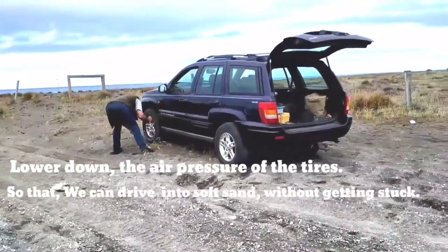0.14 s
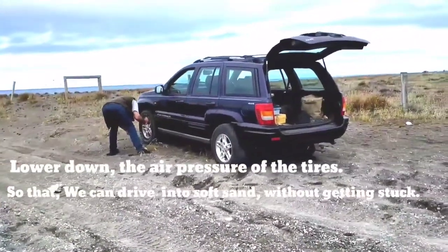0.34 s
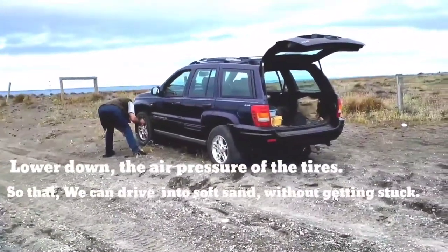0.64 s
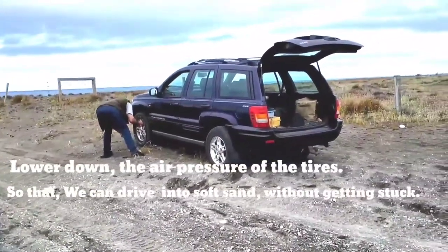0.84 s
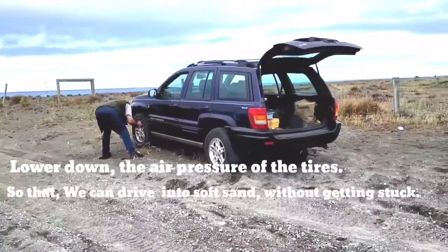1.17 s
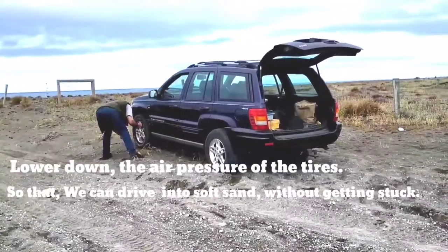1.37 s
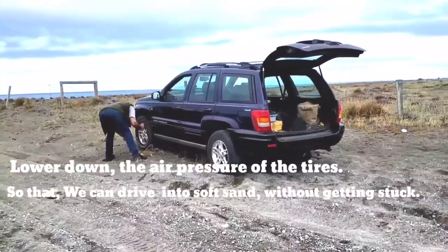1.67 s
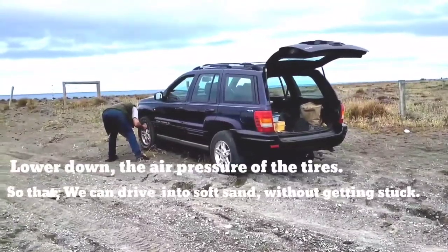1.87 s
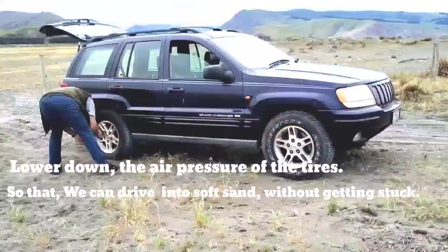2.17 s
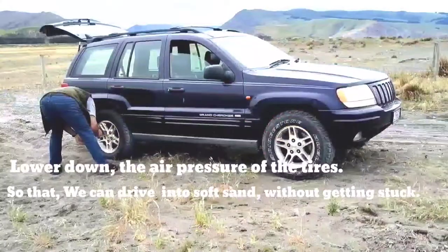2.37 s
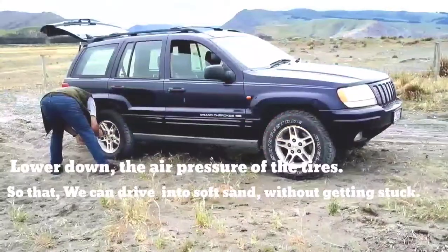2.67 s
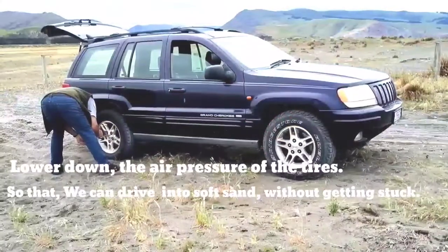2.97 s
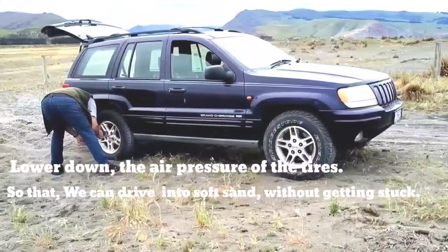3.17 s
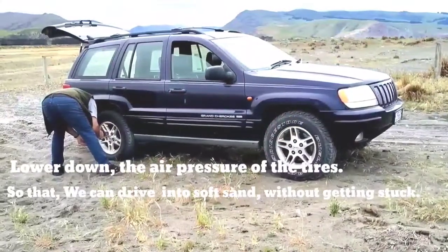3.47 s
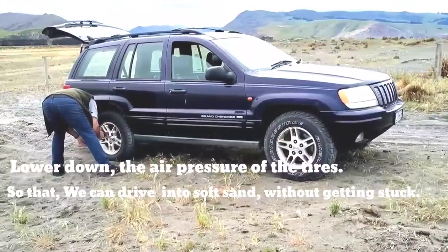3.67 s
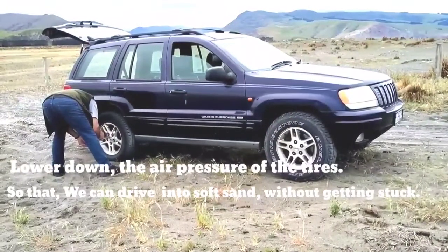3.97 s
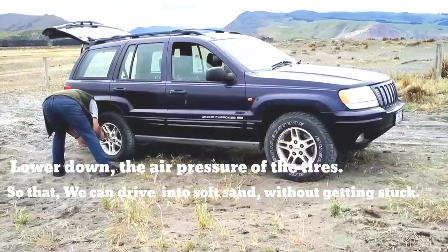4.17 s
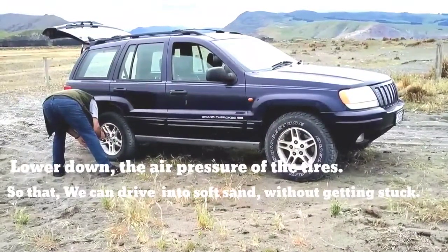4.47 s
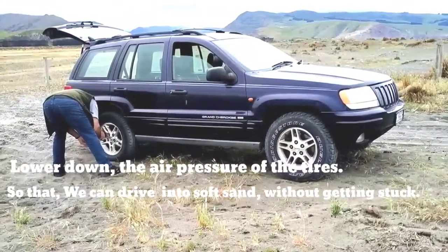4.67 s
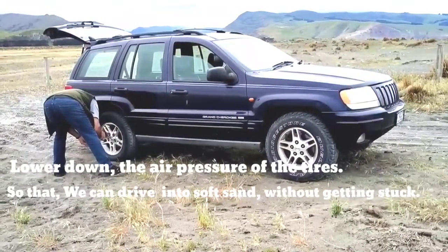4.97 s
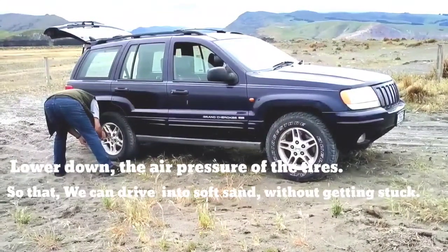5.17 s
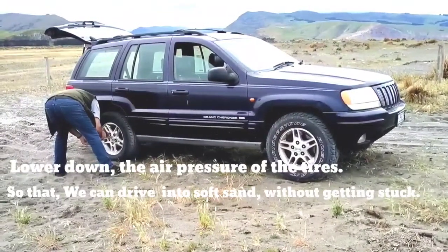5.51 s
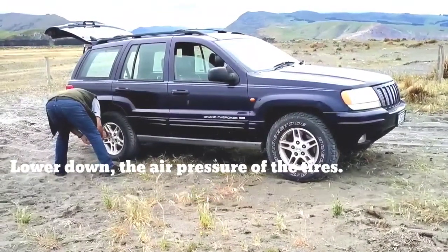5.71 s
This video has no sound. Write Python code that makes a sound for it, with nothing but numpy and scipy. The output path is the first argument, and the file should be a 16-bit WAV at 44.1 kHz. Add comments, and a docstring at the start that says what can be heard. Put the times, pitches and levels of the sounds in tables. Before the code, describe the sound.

Outdoors in gusty wind, shoes scuff grit and a tyre valve releases a bright hiss that cuts out briefly, then continues steadily.

```python
"""On a windy sandy track, air is let out of a car tyre. We listen from behind the car and then,
after a short silence, from beside it. Shoes scuff the grit, the valve squeaks as its pin is pressed,
and a thin bright jet of air hisses out, coloured by the wheel.
Wind buffets the microphone and a lark sings far away."""
import sys
import numpy as np
from scipy import signal
from scipy.fft import rfft, irfft
from scipy.io import wavfile
from scipy.ndimage import uniform_filter1d

SR = 44100
rng = np.random.default_rng(int(sys.argv[2]) if len(sys.argv) > 2 else 0)


def put_to_file(sound):
    """Save the sound as 16-bit audio at rate SR, in the file named by the first command-line argument."""
    columns = np.atleast_2d(sound).T  # one column per channel
    safe = np.clip(columns, -1, 1)
    whole_steps = np.round(safe * 32767)
    wavfile.write(sys.argv[1], SR, whole_steps.astype(np.int16))


N = 257753
T = np.arange(N) / SR
HZ = np.maximum(np.arange(N // 2 + 1) * SR / N, 1)

# broad hiss of the jet in each place: (frequency [Hz], relative level [dB])
HISS_BEHIND = [(300, -41), (1000, -31.5), (2300, -25.5), (3600, -25.5), (5200, -29.5), (7000, -25),
               (10000, -27), (13000, -14), (15500, -19)]
HISS_BESIDE = [(300, -34), (900, -34), (1500, -29), (2300, -25), (3150, -32.5), (3900, -28.5), (5000, -27),
               (7000, -28.5), (11500, -23), (13200, -16), (15500, -10)]
# bands that valve, rim and wheel arch boost: (frequency [Hz], width [Hz], relative level [dB])
WHEEL_BANDS_BEHIND = [(7780, 330, -10.5), (8220, 430, -11), (9400, 170, -16.5), (10050, 250, -16),
                      (10900, 200, -26), (11400, 200, -12), (12300, 430, -13), (12750, 450, -20),
                      (13550, 250, -13.5), (13600, 310, -7), (14550, 410, -5), (14900, 310, -2),
                      (15300, 130, 1)]
WHEEL_BANDS_BESIDE = [(4340, 200, -26), (5680, 300, -18), (6200, 370, -16), (6830, 230, -17),
                      (7390, 210, -12.5), (7680, 100, -11.5), (7980, 140, -15), (8280, 240, -10),
                      (8780, 340, -9), (9180, 230, -14), (10015, 237, -5), (10430, 220, -5.5),
                      (10640, 180, -12), (10900, 130, -27), (11140, 89, -10), (11940, 150, -7.5),
                      (12000, 210, -19), (12450, 190, -6.5), (12720, 240, -9), (13200, 100, -7),
                      (14130, 330, 2.5), (14700, 380, 2), (15030, 520, 3.5), (16500, 120, -6)]
# air spitting as the pin first lifts: (time [s], length [s], level [dB])
AIR_SPITS = [(1.232, 0.034, -68.5), (1.41, 0.078, -82), (1.563, 0.031, -75)]
# squeaks of the barely open valve: (time [s], length [s], start pitch [Hz], middle pitch [Hz],
# end pitch [Hz], level [dB], relative level of the octave above [dB])
VALVE_SQUEAKS = [(1.268, 0.015, 7800, 7580, 7600, -55, -22), (1.279, 0.024, 7400, 7270, 7300, -62.5, -4),
                 (1.293, 0.029, 7280, 7500, 7520, -62.5, -18), (1.352, 0.053, 7660, 7700, 7350, -76.5, 10),
                 (1.403, 0.017, 7300, 7030, 6800, -72, 12.5)]
# the hand covers or uncovers the hiss: (middle time [s], length [s], change [dB])
HAND_MOVES = [(4.42, .3, -1.3), (5.302, 0.48, 1.74)]
# shoes on the grit: (time [s], length [s], rasp level [dB], crunch level [dB])
SHOE_SCUFFS = [(1.015, 0.038, -66.5, -76), (1.225, 0.024, -63, -76), (1.473, 0.034, -65, -71),
               (1.555, 0.026, -63.5, -77), (1.577, 0.0896, -64.5, -51), (2.046, 0.068, -69, -77),
               (5.28, .02, -62, -72)]
# gritty rasp and hollow crunch of a scuff: (frequency [Hz], relative level [dB])
RASP_COLOUR = [(300, -2.5), (1200, 5.5), (2400, 7.5), (3600, 2.5), (4900, -1.5), (6000, -17), (8000, -7),
               (10000, -27), (15000, -12.5)]
CRUNCH_COLOUR = [(150, 0.5), (400, 7.5), (700, -4), (820, -3), (900, 7.5), (1020, -6.5), (1350, -4),
                 (2000, -38), (4000, -32)]
# wind rumble in each place: (frequency [Hz], relative level [dB])
WIND_BEHIND = [(15, -15), (35, -1.5), (60, 1.5), (95, -1), (135, -6), (200, -12.5), (300, -22.5),
               (450, -36), (700, -51), (1000, -61.5)]
WIND_BESIDE = [(15, 5), (35, -3), (60, -6), (95, -13.5), (140, -23.5), (210, -33.5), (290, -46.5),
               (420, -67)]
# gusts on top of the breeze: (middle time [s], length [s], level [dB])
WIND_GUSTS = [(0.752, 0.029, -29), (0.926, 0.02, -30.5), (1.483, 0.017, -29.5), (1.625, 0.088, -33),
              (1.894, 0.11, -29.5), (1.989, 0.044, -30.5), (2.151, 0.037, -29), (2.507, 0.19, -40.5),
              (3.195, 0.055, -38), (3.518, .05, -40.5), (3.67, 0.1, -33.5), (3.857, 0.072, -37.5),
              (4.23, 0.047, -38.5), (4.55, 0.11, -44), (4.955, 0.025, -37.5), (5.13, 0.12, -38),
              (5.463, 0.11, -39), (5.796, 0.07, -38.5)]
# small swirls of air that hit the microphone: (time [s], peak level [dB], width [s])
WIND_EDDIES = [(2.847, -34.5, 0.0059), (3.179, -25, 0.0046), (3.63, -31, 0.0043), (4.052, -32.5, 0.0044),
               (5.098, -30, 0.0048)]
# lark whistles: (time [s], length [s], start pitch [Hz], middle pitch [Hz], end pitch [Hz], level [dB])
LARK_NOTES = [(0.446, 0.092, 4650, 4150, 4000, -80.5), (.59, .068, 4450, 4060, 3850, -80),
              (0.697, 0.14, 4540, 4470, 4500, -86), (0.929, 0.21, 4210, 3900, 3940, -81),
              (1.264, 0.09, 3250, 3070, 2660, -76.5), (2.735, 0.033, 3780, 3540, 3300, -72),
              (2.805, .06, 3750, 3800, 3870, -76), (2.986, 0.038, 3920, 3400, 3250, -72),
              (3.08, .24, 3680, 3800, 3800, -69), (3.305, 0.034, 3800, 3570, 3240, -68),
              (3.42, 0.17, 3660, 3780, 3740, -70), (3.65, 0.057, 3600, 3450, 3230, -77)]
# hush of the open air: (frequency [Hz], relative level [dB])
AIR_COLOUR = [(100, 7), (600, -3.5), (1200, -1.5), (2500, -3), (4500, -9), (5600, -17), (6800, -15.5),
              (7800, -13), (9000, -18), (12000, -14), (15300, -7)]

LEAVE_S, RETURN_S, FADE_S = 2.253, 2.333, 0.098   # the first place cuts out, the second fades in
JET_BEHIND_DB, JET_BESIDE_DB = -53.5, -50   # body of the hiss at full flow
TOP_DB = 7   # how far the highest treble stands above that body
OPEN_S, OPENING_S, OPENING_RISE_DB = 1.602, 0.2, 22.5   # the pin goes down and the jet swells
EASE_S, EASING_S, EASED_DB = 2.155, 0.052, -11.5   # the thumb eases off the pin
PRESS_S, PRESSING_S, LIGHT_PRESS_DB = 2.71, 0.12, -1.1   # a light hold, then the pin is pressed home
SNAP_S, SNAP_DB, SNAP_DECAY_S = 1.4655, -52.5, 0.017   # a pebble snaps, then fades by 60 dB
BREEZE_BEHIND_DB, BREEZE_BESIDE_DB = -33, -46.5
LULL_S, LULL_DB_PER_S = 1.56, 15   # behind the car the breeze dies down


def jet(top_db, hiss_colour, wheel_bands, flutter_db, sway_db=0.44, sway_hz=4, top_hz=12500):
    """Rushing air rings in the wheel; its highest treble is a narrow beam that sways with the hand."""
    power = colour(hiss_colour) ** 2
    for hz, width, db in wheel_bands:
        power = power + (from_db(db) / (1 + ((HZ - hz) / (0.7 * width)) ** 2)) ** 2
    top_share = 1 / (1 + (top_hz / HZ) ** 60)
    beam = from_db(top_db + sway_db * drift(sway_hz))
    body = noise(np.sqrt(power * (1 - top_share)))
    top = noise(np.sqrt(power * top_share))
    return (body + beam * top) * from_db(flutter_db * drift(14))


def valve_opening(squeak_waver=0.0061):
    """Air spits and squeaks through the narrow gap, then flows fully until the thumb eases off."""
    opened = ramp(OPEN_S, OPENING_S)
    flow_db = JET_BEHIND_DB - OPENING_RISE_DB * (1 - opened) + EASED_DB * ramp(EASE_S, EASING_S)
    flow = from_db(flow_db) * (T > OPEN_S)
    spits = sum(from_db(db) * burst(start, length) for start, length, db in AIR_SPITS)
    top_db = TOP_DB * opened   # the jet brightens as it grows
    sound = (flow + spits) * jet(top_db, HISS_BEHIND, WHEEL_BANDS_BEHIND, flutter_db=1.1)
    waver = squeak_waver * drift(400)
    for *note, db, octave_db in VALVE_SQUEAKS:
        phase, swell = glide(*note, waver)
        sound += from_db(db) * swell * (np.sin(phase) + from_db(octave_db) * np.sin(2 * phase))
    return sound


def valve_held(turn_db_per_s=0.3):
    """With the pin held down, the hand shades the hiss while the treble beam slowly turns our way."""
    flow_db = JET_BESIDE_DB + LIGHT_PRESS_DB * (1 - ramp(PRESS_S, PRESSING_S))
    hand_db = sum(db * hump(middle, length) for middle, length, db in HAND_MOVES)
    top_db = TOP_DB + turn_db_per_s * (T - T[T > RETURN_S].mean())
    # taking hand_db off the top lets these moves change only the body of the hiss
    hiss = jet(top_db - hand_db, HISS_BESIDE, WHEEL_BANDS_BESIDE, flutter_db=0.5)
    return from_db(flow_db + hand_db) * hiss


def scuffs(slips_per_s=105, grain_db=-2.0):
    """Grit sticks and slips under a shoe: each slip starts sharply and fades before the next."""
    slip_count = np.cumsum(slips_per_s * np.exp(0.25 * drift(60))) / SR
    grains = rms_one(np.exp(-2 * (slip_count % 1)) * from_db(grain_db * drift(120)))
    rasp, crunch = noise(colour(RASP_COLOUR)), noise(colour(CRUNCH_COLOUR))
    slides = sum(burst(start, length) * (from_db(rasp_db) * rasp + from_db(crunch_db) * crunch)
                 for start, length, rasp_db, crunch_db in SHOE_SCUFFS)
    return grains * slides


def pebble_snap(brightening=0.46):
    """A hard pebble snaps under the sole, brighter than the sliding grit."""
    decay = (T > SNAP_S) * np.exp(-np.log(1000) * np.abs(T - SNAP_S) / SNAP_DECAY_S)
    return from_db(SNAP_DB) * decay * noise(colour(RASP_COLOUR) * HZ ** brightening)


def wind(level, rumble_colour, lumpy_db, split_hz):
    """Swirling air rumbles on the microphone; the finer swirls, above split_hz, come in lumps."""
    rumble = noise(colour(rumble_colour))
    fine = irfft(rfft(rumble) * HZ ** 2 / (HZ ** 2 + split_hz ** 2), N)
    rumble = rumble + fine * (from_db(lumpy_db * drift(49)) - 1)
    running_level = np.sqrt(uniform_filter1d(rumble ** 2, size=SR // 10))
    return level * rumble / running_level


def wind_strength(breeze_db, buffet_db, buffet_hz=10):
    """A wavering breeze plus gusts that each swell and die away."""
    breeze = from_db(breeze_db + buffet_db * np.tanh(drift(buffet_hz)))
    gust_power = sum(from_db(db) ** 2 * hump(middle, length) for middle, length, db in WIND_GUSTS)
    return np.sqrt(breeze ** 2 + gust_power)


def eddies():
    """Each swirl of air is one smooth push, with a pull just before and after."""
    pressure = np.zeros(N)
    for middle, db, width in WIND_EDDIES:
        distance = ((T - middle) / width) ** 2 / 2
        pressure += from_db(db) * (1 - distance) * np.exp(-distance)
    return pressure


def lark(pitch_waver=0.0052):
    """A far-off lark whistles, trills and twitters, fading in and out on the wind."""
    whistles, waver = np.zeros(N), pitch_waver * drift(60)
    for *note, db in LARK_NOTES:
        phase, swell = glide(*note, waver)
        whistles += from_db(db) * swell * np.sin(phase)
    return (whistles + lark_trill() + lark_twitter()) * from_db(2 * drift(30))


def lark_trill(sweeps_per_s=108, middle_hz=4350, db=-74):
    """A buzzing run of tiny downward sweeps opens the song."""
    along = (T * sweeps_per_s) % 1
    hz = middle_hz * (1 + 0.63 * (0.5 - along))
    sweeps = np.sin(np.pi * along) ** 2 * np.sin(phase_of(hz))
    return from_db(db) * burst(start=0.12, length=0.21) * sweeps


def lark_twitter(notes_per_s=30, middle_hz=3800, db=-75.5):
    """Quick notes among the whistles, each sliding up or down by chance."""
    pace = notes_per_s * np.exp(0.89 * drift(20))
    pulses = np.sin(phase_of(pace) / 2) ** 4
    hz = middle_hz * (1 + 0.17 * np.tanh(drift(35)))
    return from_db(db) * burst(start=0.56, length=0.77) * pulses * np.sin(phase_of(hz))


def open_air(db=-71):
    """The faint, steady hush of the outdoors."""
    return from_db(db) * noise(colour(AIR_COLOUR))


def glide(start, length, first_hz, middle_hz, last_hz, waver):
    """Phase and loudness curve of a whistle that bends through three pitches."""
    along = np.clip((T - start) / length, 0, 1)
    hz = np.polyval(np.polyfit([0, 0.5, 1], [first_hz, middle_hz, last_hz], 2), along)
    swell = np.sqrt(2 * np.abs(np.sin(np.pi * along)))
    return phase_of(hz * (1 + waver)), swell


def phase_of(hz):
    """The angle a wave has turned through as its pitch changes."""
    return 2 * np.pi * np.cumsum(hz) / SR


def colour(points):
    """Gain at every frequency, falling away beyond the first and last point."""
    hz, db = np.transpose(points)
    ends = np.minimum(HZ / hz[0], 1) ** 2 * np.minimum(hz[-1] / HZ, 1) ** 4
    return from_db(np.interp(np.log(HZ), np.log(hz), db)) * ends


def noise(gain):
    """Steady noise of a given colour, with an average level of one."""
    return rms_one(irfft(rfft(rng.standard_normal(N)) * gain, N))


def drift(rate_hz):
    """A random wander around zero, typically one unit in size."""
    return noise(1 / (1 + (HZ / rate_hz) ** 2))


def burst(start, length, edge_s=0.01):
    """Switch on and off with soft edges."""
    return np.clip(np.minimum(T - start, start + length - T) / edge_s + 0.5, 0, 1)


def ramp(start, length):
    """A straight rise from zero to one."""
    return np.clip((T - start) / length, 0, 1)


def hump(middle, length):
    """A smooth swell from nothing up to one and back."""
    return np.exp(-(2 * (T - middle) / length) ** 2)


def from_db(db):
    """Turn decibels into a gain."""
    return 10 ** (np.asarray(db) / 20)


def rms_one(x):
    """Scale to an average (rms) level of one."""
    return x / np.sqrt(np.mean(x ** 2) + 1e-20)


def scene():
    """First from behind the car, then from beside it; both ears hear the same."""
    outdoors = open_air() + lark()
    dying_breeze_db = BREEZE_BEHIND_DB - LULL_DB_PER_S * np.maximum(T - LULL_S, 0)
    strength_behind = wind_strength(dying_breeze_db, buffet_db=2.5)
    wind_behind = wind(strength_behind, WIND_BEHIND, lumpy_db=6.5, split_hz=530)
    strength_beside = wind_strength(BREEZE_BESIDE_DB, buffet_db=3)
    wind_beside = wind(strength_beside, WIND_BESIDE, lumpy_db=1.5, split_hz=190)
    behind = valve_opening() + scuffs() + pebble_snap() + wind_behind
    beside = valve_held() + eddies() + wind_beside
    fade_out = np.clip((LEAVE_S - T) / 0.0018, 0, 1)
    fade_in = ramp(RETURN_S, FADE_S) ** 2
    mono = fade_out * (behind + outdoors) + fade_in * (beside + outdoors)
    return np.array([mono, mono])


def record(dry, cutoff_hz=15500):
    """The very highest treble is cut off steeply."""
    return signal.sosfilt(signal.ellip(14, 0.1, 80, cutoff_hz, fs=SR, output="sos"), dry)


dry = scene()
out = record(dry)
put_to_file(out)
```